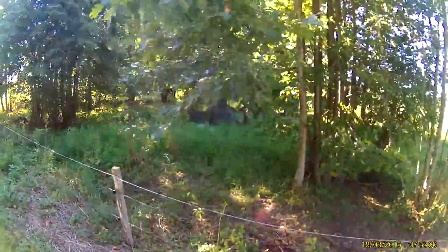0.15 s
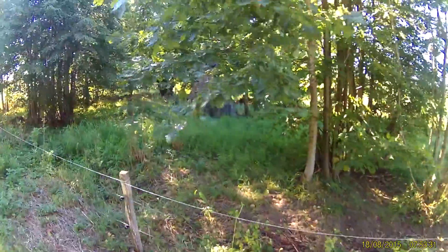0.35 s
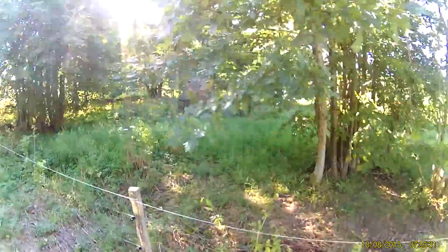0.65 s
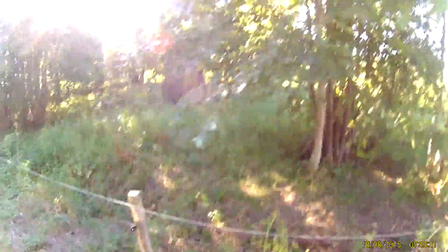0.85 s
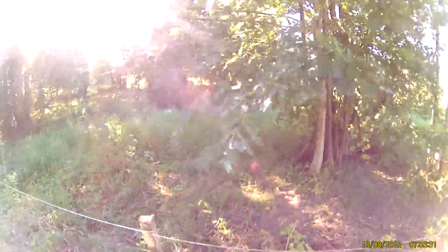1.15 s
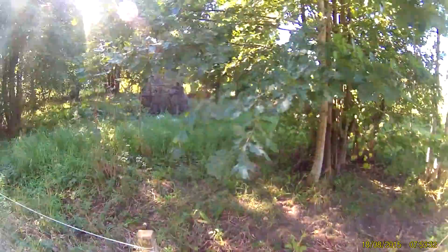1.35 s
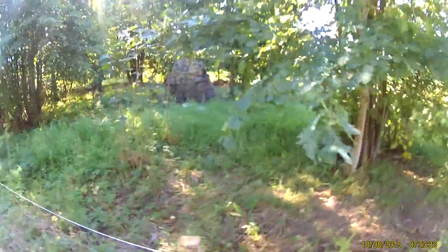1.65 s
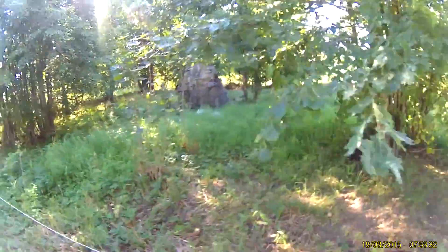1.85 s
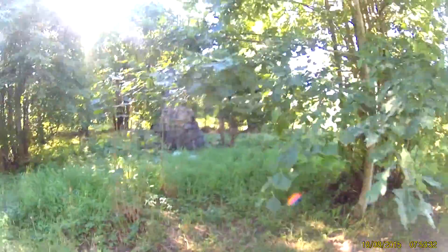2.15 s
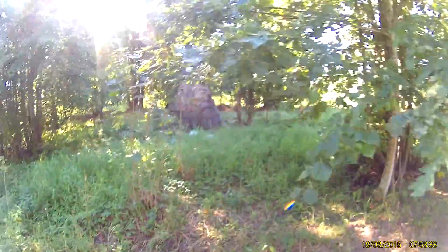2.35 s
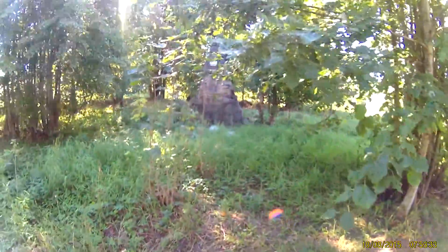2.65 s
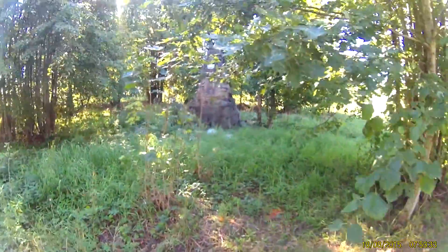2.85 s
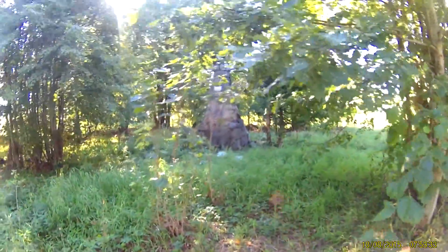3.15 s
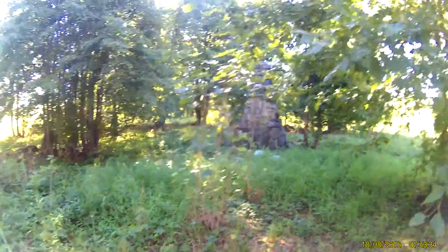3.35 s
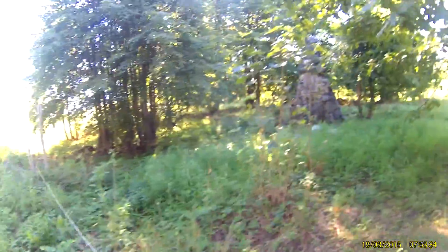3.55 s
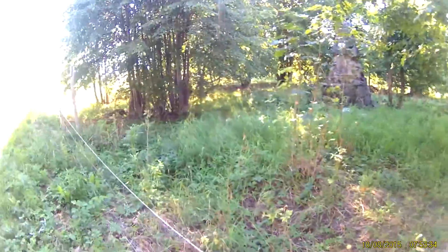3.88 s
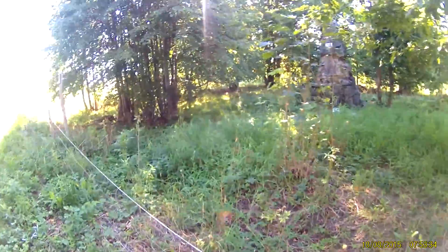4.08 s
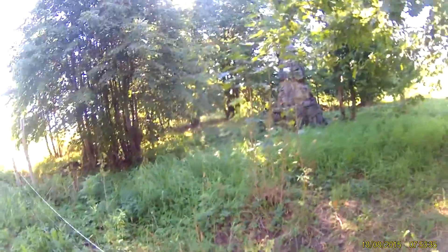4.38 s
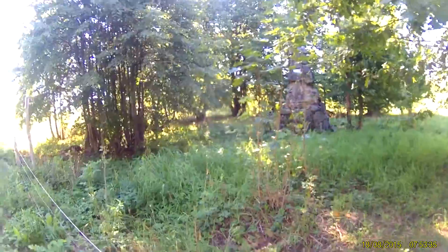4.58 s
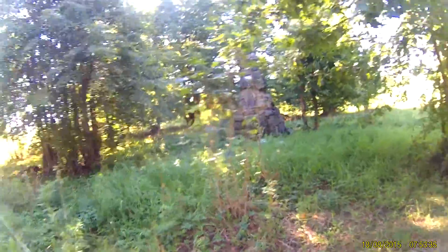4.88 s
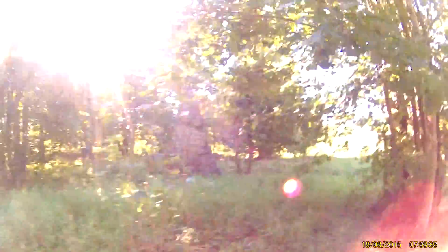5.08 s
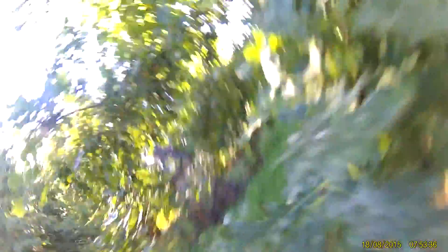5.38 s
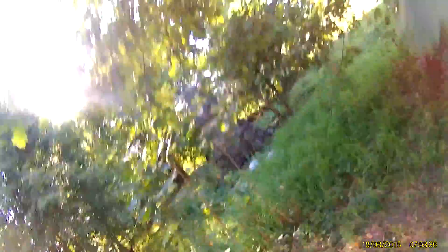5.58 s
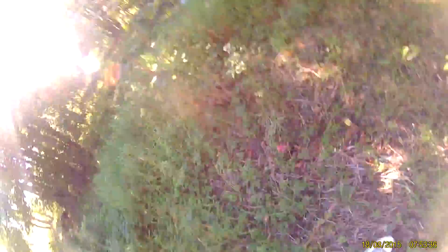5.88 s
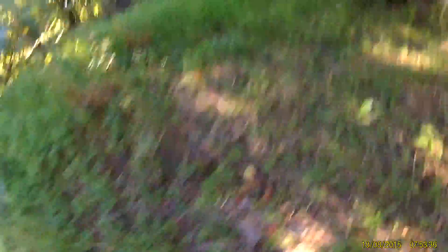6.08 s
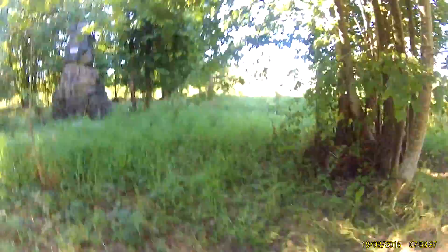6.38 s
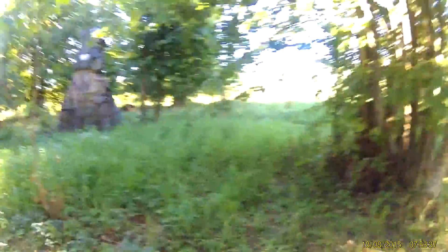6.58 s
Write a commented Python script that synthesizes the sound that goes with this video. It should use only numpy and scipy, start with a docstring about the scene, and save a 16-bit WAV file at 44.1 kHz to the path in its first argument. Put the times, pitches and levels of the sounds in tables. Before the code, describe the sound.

Bumps and scrapes on a small plastic camera case with dry crackles in quiet woodland, a faint far bird trill, then a hard final clatter.

```python
"""A small camera is carried through overgrown woodland, in quiet outdoor air with hiss and a thin whine.
From 0.7 s its plastic case is bumped and brushed: struck modes ring and sliding makes grainy noise, with
the first dense flurry near 2 s. Dry fibres crackle at the microphone port as short noise bursts.
After 3.4 s the handling thins out and a far bird trills rising notes from 3.75 to 4.6 s.
Then knocks, scrapes and crackles crowd in again, hardest near 5.9 s, and last to the end."""
import sys
import numpy as np
from scipy import signal
from scipy.fft import rfft, irfft, next_fast_len
from scipy.io import wavfile
from scipy.ndimage import uniform_filter1d, map_coordinates

SR = 44100
rng = np.random.default_rng(int(sys.argv[2]) if len(sys.argv) > 2 else 0)


def unload_wav(signal):
    """Save mono or channel-first audio to the path in sys.argv[1] as 16-bit WAV at rate SR, clipped to [-1, 1]."""
    wavfile.write(
        sys.argv[1],
        SR,
        np.round(np.clip(np.atleast_2d(signal).T, -1, 1) * 32767).astype(np.int16),
    )


N = 296793
TIME = np.arange(N) / SR  # s

# bumps on the case: time_s, strength_db (rms over 10 ms), brightness (dB per octave),
# hard_edge_db and lingering_boom_db (both relative to the strength)
BUMPS = [(0.6936, -39, -4.5, -24, -13), (1.046, -41.5, -11, -27, -16), (1.087, -52.5, 4, -5.5, -21),
         (1.2559, -29.5, -8, -24.5, -14), (1.2797, -27.5, 0.5, -44, -1), (1.5613, -20, -4, -18, 3),
         (1.756, -32.5, -10, -25, -13), (2.0199, -35, -6, -20, -30), (2.0639, -25, -6, -16, -20),
         (2.0752, -23, -5, -25, -21), (2.0946, -24.5, -14, -38, -9), (2.1131, -20, -3, -9, -24),
         (2.1372, -28.5, 0, -15, -20), (2.1629, -22.5, -10, -36, -32), (2.171, -37, -2.5, -35, -15),
         (2.2326, -36.5, -1.5, -44, -5), (2.274, -39, -6.5, -27, -1), (2.366, -37, -3.5, -28, -13),
         (2.4002, -44, -3, -33, -19), (2.603, -56.5, 13, -25, -30), (2.6493, -32.5, -4.5, -26.5, -8),
         (2.681, -37, -5.5, -44, -5), (2.9307, -33, 0, -13, -7), (2.9561, -31, -4.5, -22.5, -3.5),
         (3.057, -31, 2, -32, -32), (3.0814, -36, -.5, -17, -25), (3.1073, -35, 1.5, -10, -33),
         (3.1269, -37, 1, -8.5, -18), (3.158, -40, 0, -20, -27), (3.2098, -41, 1, -11.5, -10),
         (3.262, -39.5, 0, -6, -24), (3.385, -43.5, 3.5, -12, -12), (4.024, -49.5, -7, -18, -20),
         (4.148, -41, 0, -18.5, -5), (4.6743, -34.5, -14, -19.5, -21), (4.7812, -45, 3, -13, -22),
         (4.908, -32.5, -1.5, -12, -11), (4.978, -31.5, 2, -20.5, -27), (4.993, -28.5, -4, -19, 1),
         (5.0601, -20.5, -8, -17.5, -4), (5.0804, -21.5, 1, -16.5, 0.5), (5.1874, -24, 5, -52, -16),
         (5.2303, -34, -5, -23, -12), (5.249, -20.5, 1.5, -48, -19), (5.3024, -36, 6, -11.5, -9),
         (5.3381, -31.5, -1.5, -25.5, -21), (5.406, -26.5, -1, 0.5, -15), (5.428, -36, 4, 5.5, -12),
         (5.4721, -31, 5.5, 4, -40), (5.4831, -29, 3.5, 8, -30), (5.5419, -40, 1.5, -9, -25),
         (5.576, -36.5, -5.5, -23, -19), (5.6533, -39.5, -16, -39, 4), (5.792, -24, -4, -15, -11),
         (5.8082, -14.5, -8, -21.5, -14), (5.8212, -15, -3.5, -5, -21), (5.8275, -18.5, -0.5, -4, -19),
         (5.84, -14, -4, -15, -25), (5.944, -22.5, -4.5, -25, -9), (5.9512, -8.5, 2, -5, -24),
         (6.0471, -24.5, -4.5, -17, -28), (6.0692, -24, -3.5, -18, -32), (6.078, -27, -5, -17, -12),
         (6.1903, -30, -6.5, -19, 4.5), (6.3182, -28, -5.5, -28, -2), (6.336, -26, -7, -35, -19),
         (6.3494, -24.5, -5.5, -37, -6.5), (6.5511, -30.5, -7, -14.5, -9), (6.695, -39.5, -9, -25, -8)]


def knocks(crack_db=-8, crack_t60=0.01, detune=0.066, attack_s=0.00021, boom_hz=246, boom_t60=0.1):
    """Modal impact: a bump excites damped modes and broadband noise, and the body booms on at one pitch."""
    # damped modes of the case: pitch_hz, level_db, t60_s
    case_modes = [(127, -9, 0.0073), (219.6, 11.5, 0.016), (366, -1, 0.026), (840, -1.5, 0.0048),
                  (882, -3.5, 0.022), (1115, -20.5, 0.056), (1340, 1.5, 0.0088), (1428, -23, 0.033),
                  (1576, 1, 0.0061), (1674, -24.5, 0.054), (1972, -23, 0.049), (2140, -15.5, 0.008),
                  (3415, -17, 0.01), (4690, -28, 0.0055)]
    # frequency bands whose levels are set separately for each bump: low_hz, high_hz
    register_bands = [(35, 470), (660, 1130), (1080, 1950), (2150, 11000)]
    # tone colour of the broadband crack: frequency_hz, level_db
    crack_colour = [(100, -4), (700, 16.5), (1600, -13.5), (2400, -12.5), (4200, -18.5), (6000, -29),
                    (9000, -47), (14000, -20)]
    lead_s, swell_s = .006, .003  # silence ahead of the contact; rise time of the boom
    out = np.zeros(N)
    t = np.maximum(0, np.arange(SR // 8) / SR - lead_s)
    hz, level_db, t60 = np.transpose(case_modes)[:, :, None]
    fades = amp(level_db - 60 * t / t60)
    rise = 1 - np.exp(-t / attack_s)
    crack_fade = amp(-60 * t / crack_t60)
    crack_tone = response(crack_colour, size=256)
    boom_fade = amp(-60 * t / boom_t60) * (1 - np.exp(-t / swell_s))
    boom = np.sqrt(2) * np.sin(2 * np.pi * boom_hz * t) * boom_fade
    filters = [bandpass(edges, order=2) for edges in register_bands]

    for s, strength_db, tilt_db, hard_db, boom_db in BUMPS + taps():
        blow_db = [*register_levels(s, strength_db, tilt_db), strength_db + hard_db]
        # the grip shifts the damped modes most
        pitch = hz * (1 + detune * t60.min() / t60 * rng.uniform(-0.89, 1, hz.shape))
        mode_gain = amp(2 * rng.standard_normal(hz.shape))
        ring = np.sum(mode_gain * fades * np.sin(2 * np.pi * pitch * t), axis=0)
        crack_noise = np.convolve(rng.standard_normal(len(t)), crack_tone)[:len(t)]
        crack = rise * crack_fade * crack_noise
        clack_db, edge_db = blow_db[-2:]
        hardness = np.clip(1 + (edge_db - clack_db) / 20, 0, 1)
        hit = chatter(burst(rise * ring) + amp(crack_db) * burst(crack), hardness, count=3)
        # place and hardness of the contact decide how strongly each register answers
        blow = sum(amp(db) * burst(signal.sosfiltfilt(sos, hit)) for sos, db in zip(filters, blow_db))
        add(out, s - lead_s, blow + amp(strength_db + boom_db) * boom)
    return out


def taps(taps_per_s=19, scatter_db=1.5):
    """Light repeated impacts at jittered moments, as rows like those of BUMPS."""
    # stretches where light taps patter on the case: start_s, end_s, mean_level_db
    patter = [(2.2, 2.42, -49.5), (2.981, 3.2, -44), (4.798, 4.9, -45), (5.31, 5.39, -43),
              (5.601, 5.78, -56)]
    tilt_db, edge_db, boom_db = -1.5, -19.5, -14  # dB per octave; then dB relative to the strength
    rows = []
    for start, end, db in patter:
        for s in np.arange(start, end, 1 / taps_per_s):
            moment = s + rng.random() / taps_per_s
            rows.append((moment, db + scatter_db * rng.standard_normal(), tilt_db, edge_db, boom_db))
    return rows


def register_levels(s, db, tilt_db):
    """Excitation by position: the brightness and the struck spot share a bump over three lower registers."""
    # where the case is struck: time_s, spot_db (favours the second register and damps the third)
    struck_spot = [(1.6, -4.5), (2.03, 10), (2.16, 10), (2.24, -2), (2.68, 4), (3.2, 0.5), (4.9, -8),
                   (5.2, 1.5), (5.83, -7.5), (5.95, 1.5), (6.07, -6), (6.34, 2)]
    octaves = np.array([0, 2, 3])
    spot_db = np.interp(s, *np.transpose(struck_spot))
    weight_db = tilt_db * octaves + spot_db * np.array([0, 1, -1])
    return db + weight_db - 20 * np.log10(np.linalg.norm(amp(weight_db)))


def chatter(hit, hardness, count):
    """Rebound: a hard contact strikes again a few times within milliseconds, each time more weakly."""
    gaps = np.cumsum(rng.uniform(.0008, .0028, count))  # s after the first contact
    out = hit.copy()
    for k, gap in enumerate(gaps):
        rebound_gain = hardness * .72 ** (k + 1) * rng.choice([-1, 1])
        add(out, gap, rebound_gain * hit)
    return out


def rubbing(scrape_db=2, treble_db=-2, rough_db=2.5):
    """Stick-slip friction: many small slips make a grainy scrape, and the drag shakes the low resonance."""
    # sliding friction heard through the shell: frequency_hz, level_db (per Hz)
    scrape_colour = [(150, -22), (400, -8.5), (540, -7), (780, 5.5), (1050, 2), (1400, 7), (1720, 9),
                     (2020, -10), (3400, -13.5), (5400, -17), (7300, -36), (9500, -26), (11500, -35),
                     (16000, -38)]
    # narrow resonances of the shell that colour the scrape: pitch_hz, width_hz, boost_db
    shell_peaks = [(2123, 150, 11.5), (2950, 340, 7), (3780, 290, 7), (4500, 150, 0), (6500, 180, 10),
                   (8500, 120, 2.5)]
    # how firmly the rubbing thing bites into the case: time_s, treble_boost_db
    bite_curve = [(.6, 4.5), (1.6, 4.5), (1.87, -2), (2.06, 4.5), (3.1, -1), (4.8, 0), (6.6, -2.5)]
    # low rumble of the drag: frequency_hz, level_db (per Hz)
    drag_colour = [(25, 1.5), (60, -0.5), (130, -5.5), (205, -0.5), (243, 2.5), (285, -11), (400, -10),
                   (550, -10), (1200, -53), (3000, -114)]
    drag_db, drag_grows = -11, .75  # rumble for a stroke of 0 dB; its dB per dB of stroke
    force = pressure()
    slips = colour(grains(rate=2600, scatter_db=2.0) * amp(rough_db * wobble(110)), scrape_colour)
    for hz, width_hz, db in shell_peaks:
        peak = signal.lfilter(*signal.iirpeak(hz, hz / width_hz, SR), slips)
        slips = slips + (amp(db) - 1) * peak
    # the low modes of the shell stay put; only the treble depends on where and how it is rubbed
    body = signal.sosfiltfilt(signal.butter(4, 2900, fs=SR, output="sos"), slips)
    bite_db = np.interp(TIME, *np.transpose(bite_curve))
    treble = wandering(slips - body, count=5) * amp(treble_db + bite_db)
    scrape = force * amp(scrape_db) * unit(body + treble)
    tugs = colour(grains(rate=900, scatter_db=1), drag_colour)
    rumble = np.hypot(amp(drag_db) * force ** drag_grows, shudder())
    return scrape + rumble * unit(tugs)


def pressure(swell_db=11, lift_db_per_s=900):
    """Contact force as an envelope: each stroke swells to its crest, eases off and lifts away."""
    # strokes of something sliding over the case: start_s, crest_s, end_s, crest_level_db (before scrape_db)
    strokes = [(0.677, 0.77, 1.6, -63.5), (1.194, 1.297, 1.75, -57), (1.554, 1.604, 1.691, -28.5),
               (1.685, 1.756, 1.84, -42.5), (1.815, 1.879, 1.9275, -23), (1.941, 1.958, 2.01, -36.5),
               (2.02, 2.037, 2.12, -34), (2.114, 2.152, 2.185, -37), (2.915, 3.02, 3.195, -47),
               (4.057, 4.1, 4.31, -60), (4.597, 4.717, 4.73, -60), (4.814, 4.928, 4.945, -45.5),
               (4.984, 5.043, 5.095, -41), (5.22, 5.236, 5.265, -42), (5.302, 5.307, 5.38, -45),
               (5.39, 5.411, 5.5, -41.5), (5.556, 5.578, 5.63, -50), (5.619, 5.718, 5.79, -57),
               (5.774, 5.812, 5.84, -34), (5.901, 5.922, 5.97, -30), (5.998, 6.023, 6.1, -43.5),
               (6.143, 6.232, 6.38, -41), (6.287, 6.332, 6.53, -38), (6.358, 6.448, 6.55, -35.5),
               (6.549, 6.585, 6.62, -33.5), (6.6, 6.67, 6.8, -57)]
    power = np.zeros(N)
    for start, crest, end, db in strokes:
        ease_db = swell_db * np.interp(TIME, [start, crest, end], [-1, 0, -1])
        apart_s = np.abs(TIME - np.clip(TIME, start, end))  # time away from contact
        power += amp(db + ease_db - lift_db_per_s * np.minimum(apart_s, 1)) ** 2
    return np.sqrt(power)


def wandering(x, count):
    """Position-dependent response: the contact roams over spots with their own short ring, shifting the colour."""
    t = np.arange(SR // 200) / SR
    spot_t60, spot_db, roam_rate = .008, -1, 7  # s; ring relative to the direct sound; knots a second
    out, total = np.zeros(N), np.zeros(N)
    for _ in range(count):
        ring = rng.standard_normal(len(t)) * amp(-60 * t / spot_t60)
        ring *= amp(spot_db) / np.linalg.norm(ring)
        ring[0] = 1
        nearness = amp(10 * wobble(roam_rate))
        out += nearness * signal.oaconvolve(x, ring)[:N]
        total += nearness
    return out / total


def shudder(start_db=-11.5, t60=0.16):
    """Exponential decay: each thump leaves the case shaking, start_db relative to its lowest register."""
    out, t = np.zeros(N), np.arange(SR // 4) / SR
    for s, db, tilt_db, *_ in BUMPS:
        thump_db = register_levels(s, db, tilt_db)[0]
        add(out, s, amp(thump_db + start_db - 60 * t / t60))
    return out


def crackle(snap_db=-1, run_db=-6, fizz_db=-6):
    """Impulsive release: dry fibres let go at the port in sharp snaps, faint ticks, and runs over a fizz."""
    # the loudest dry snaps: time_s, level_db (rms over 10 ms, before snap_db and the tone colour)
    loud_snaps = [(0.7516, -48), (1.493, -47), (1.5954, -48), (1.7419, -38), (2.15, -45), (2.2601, -34.5),
                  (2.567, -52.5), (4.1531, -47.5), (4.6602, -36), (5.171, -31), (5.2377, -35.5),
                  (5.347, -30.5), (5.4174, -27), (5.497, -31), (5.7712, -31), (5.9317, -17),
                  (5.9372, -24.5), (6.2918, -49), (6.4768, -31), (6.6422, -49.5)]
    # runs of tiny snaps: start_s, end_s, level_db (before run_db or fizz_db)
    snap_runs = [(2.098, 2.162, -48), (2.2, 2.241, -52.5), (2.244, 2.274, -46), (4.603, 4.681, -52),
                 (5.138, 5.181, -47.5), (5.224, 5.249, -43.5), (5.299, 5.395, -48), (5.401, 5.421, -42),
                 (5.449, 5.507, -48), (5.719, 5.793, -48), (5.919, 5.947, -35.5), (6.42, 6.519, -50)]
    # stretches of scattered faint ticks: start_s, end_s
    tick_spans = [(1.92, 2.39), (2.29, 2.46), (2.599, 2.63), (4.18, 4.55), (5.01, 5.12), (6.499, 7.2)]
    # tone colour of the port sounds: frequency_hz, level_db
    snap_colour = [(300, -9), (2000, -27), (4000, -13.5), (7500, -17.5), (9500, -8.5), (11800, -4),
                   (13500, -9.5), (15000, -9), (16500, -31)]
    snap_t60, rate, scatter_db = .0045, 250, 4  # s; snaps a second in a run; spread of their size
    ticks_per_s, tick_db, tick_scatter_db = 24, -56, 3
    t = np.arange(SR // 100) / SR
    out = np.zeros(N)
    fade = amp(-60 * t / snap_t60) * (1 - np.exp(-t / .0002))
    snap = lambda: burst(rng.standard_normal(len(t)) * fade)

    for s, db in loud_snaps:
        add(out, s, amp(db + snap_db) * snap())
    for start, end, db in snap_runs:
        for s in np.arange(start, end, 1 / rate):
            size_db = db + run_db + scatter_db * np.clip(rng.standard_normal(), -2, 2)
            add(out, s + .5 * rng.random() / rate, amp(size_db) * snap())
    for start, end in tick_spans:
        for s in np.arange(start, end, 1 / ticks_per_s):
            moment = s + (rng.random() - .5) / ticks_per_s
            add(out, moment, amp(tick_db + tick_scatter_db * rng.standard_normal()) * snap())
    gates = sum(amp(db) * ((TIME > start) & (TIME < end)) for start, end, db in snap_runs)
    fizz = uniform_filter1d(gates, size=400) * grains(rate=2500, scatter_db=3)
    return colour(out + amp(fizz_db) * fizz, snap_colour)


def bird(level_db=-68.0, fade_db=5):
    """Frequency modulation: a quick faint trill of upward glides, no two alike, that swells and fades."""
    start_s, crest_s, end_s = 3.75, 4.05, 4.6
    notes_per_s, note_hz, scatter_hz = 29, 5230, 159.9
    note_s, rise = .028, .1  # length; mean glide as a fraction of the pitch
    out, u = np.zeros(N), np.linspace(-.5, .5, int(note_s * SR))
    for s in np.arange(start_s, end_s, 1 / notes_per_s):
        hz = note_hz + scatter_hz * rng.standard_normal()
        swell = np.interp(s, [start_s, crest_s, end_s], [-.5, 0, -1])
        db = level_db + fade_db * swell + 2 * rng.standard_normal()
        glide_hz = hz * (1 + rise * rng.uniform(.5, 1.5) * u)
        phase = 2 * np.pi * np.cumsum(glide_hz) / SR
        note = np.cos(np.pi * u) * np.sin(phase)
        add(out, s - note_s * rng.uniform(0, 0.56), amp(db) * note)
    return out


def background(air_db=-58, whine_db=-73, whine_hz=10050):
    """Filtered noise for outdoor air and hiss, and a jittered sine for a thin electronic whine of even strength."""
    # spectrum of air and hiss: frequency_hz, level_db (per Hz)
    air_colour = [(25, -4.5), (55, -0.5), (200, -9), (500, -15), (1100, -20), (1700, -21), (2200, -25.5),
                  (7000, -29.5), (10500, -30.5), (15500, -34.5)]
    air = unit(colour(rng.standard_normal(N), air_colour)) * amp(0.24 * wobble(3.5))
    jitter_hz = 110 * wobble(700)
    whine = unit(np.sin(2 * np.pi * np.cumsum(whine_hz + jitter_hz) / SR))
    return amp(air_db) * air + amp(whine_db) * whine


def amp(db):
    """Logarithmic level: decibels to gain."""
    return 10 ** (np.asarray(db) / 20)


def unit(x):
    """Power normalization: scale to rms 1."""
    return x / np.sqrt(np.mean(x ** 2) + 1e-20)


def burst(x):
    """Energy normalization: scale a short sound to the energy of 10 ms at rms 1."""
    return x / np.sqrt(np.sum(x ** 2) / (SR / 100) + 1e-20)


def add(track, s, sound):
    """Superposition: mix a sound into a track at time s."""
    part = track[max(0, round(s * SR)):][:len(sound)]
    part += sound[:len(part)]


def wobble(rate):
    """Slow random modulation: a smooth curve through random knots, rate of them a second."""
    return map_coordinates(rng.standard_normal(int(N * rate / SR) + 4), [TIME * rate])


def grains(rate, scatter_db):
    """Random impulse train: tiny impulses of scattered size, rate a second on average, rms 1."""
    fires = rng.random(N) < rate / SR
    signs = rng.choice([-1, 1], N)
    sizes = amp(scatter_db * np.clip(rng.standard_normal(N), -2, 2))
    return unit(fires * signs * sizes)


def bandpass(edges, order):
    """Band limitation by a gentle Butterworth filter."""
    return signal.butter(order, edges, "bandpass", fs=SR, output="sos")


def colour(x, points):
    """Linear filtering: give a sound the tone colour of (Hz, dB) points."""
    return signal.oaconvolve(x, response(points))[:len(x)]


def response(points, size=2048):
    """Minimum phase by the folded cepstrum: a causal response of energy 1 shaped by (Hz, dB) points."""
    hz, db = np.transpose(points)
    grid_hz = np.fft.rfftfreq(2 * size, 1 / SR)
    gain = amp(np.interp(np.log(grid_hz + 1), np.log(hz), db))
    cepstrum = irfft(np.log(gain))[:size]
    cepstrum[1:] *= 2
    ring = irfft(np.exp(rfft(cepstrum, 2 * size)))[:size]
    return ring / np.linalg.norm(ring)


def scene():
    """Superposition of all sources at the one microphone."""
    return (background() + rubbing() + knocks() + bird() + crackle())[None]


def record(dry, top_hz=16100):
    """Saturation: the hardest bumps overload the input; a steep low-pass then limits the band at top_hz."""
    ceiling, hardness = .75, 6  # largest amplitude; sharpness of the bend towards it
    clipped = dry / (1 + np.abs(dry / ceiling) ** hardness) ** (1 / hardness)
    m = next_fast_len(N + SR // 2)
    lowpass = 1 / (1 + (np.fft.rfftfreq(m, 1 / SR) / top_hz) ** 120)
    return irfft(rfft(clipped, m) * lowpass, m)[..., :N]


dry = scene()
out = record(dry)
unload_wav(out)
```